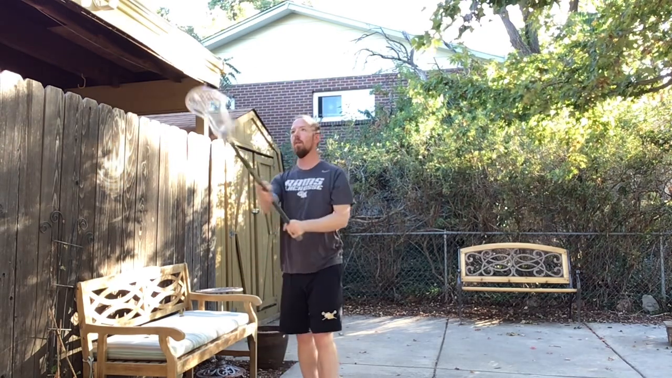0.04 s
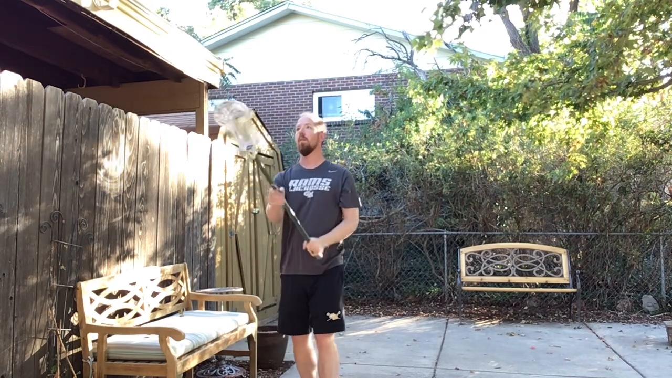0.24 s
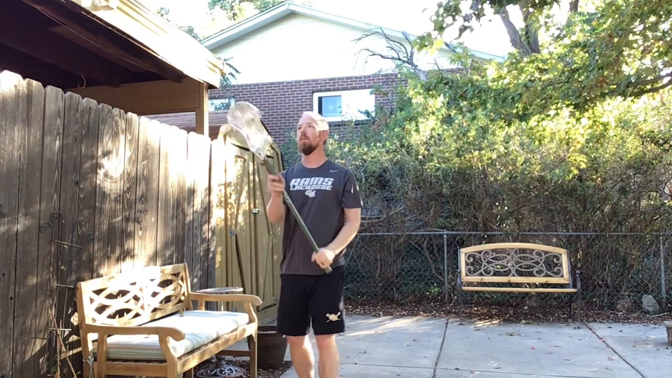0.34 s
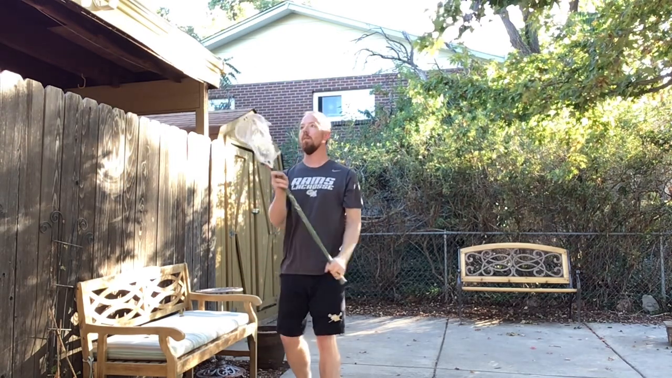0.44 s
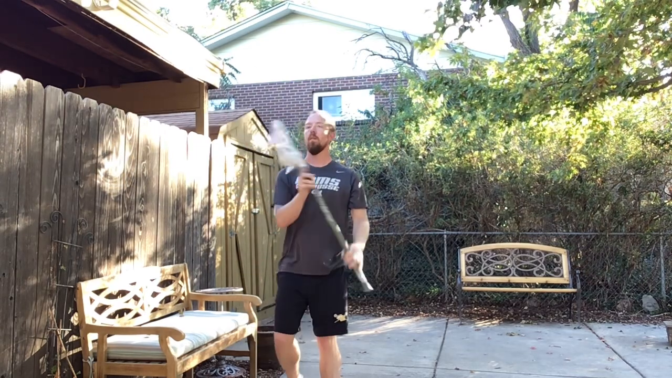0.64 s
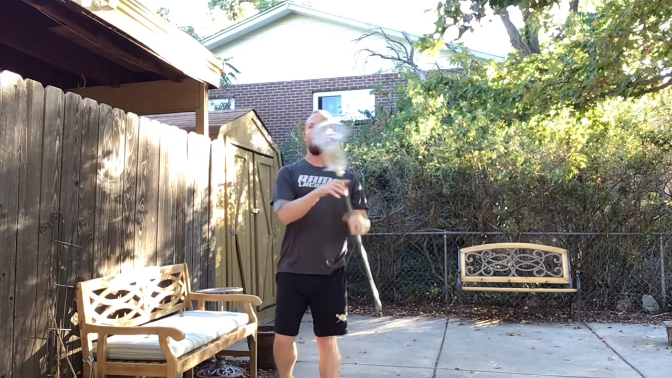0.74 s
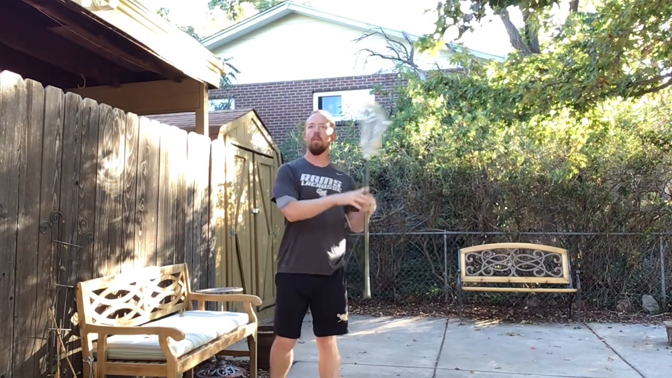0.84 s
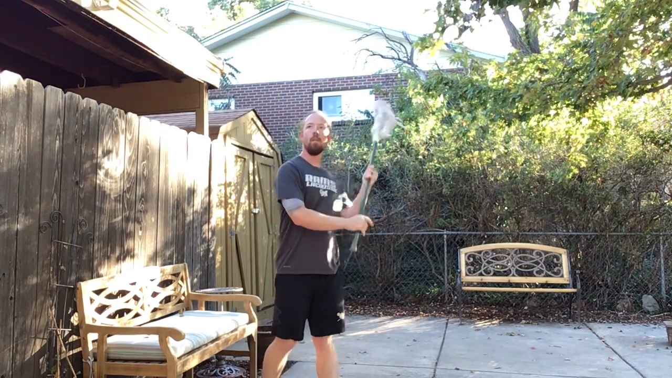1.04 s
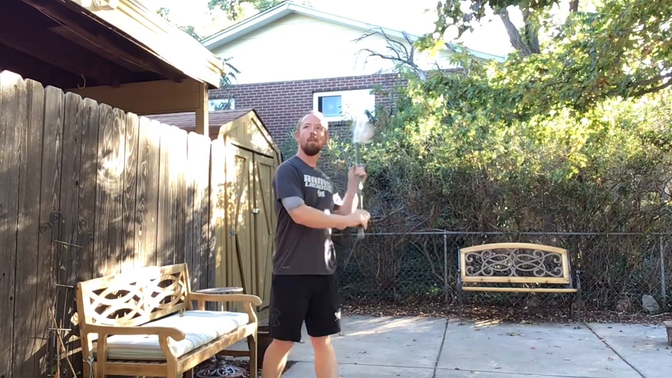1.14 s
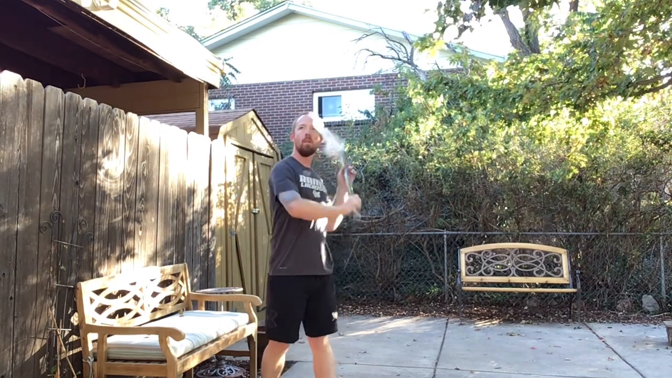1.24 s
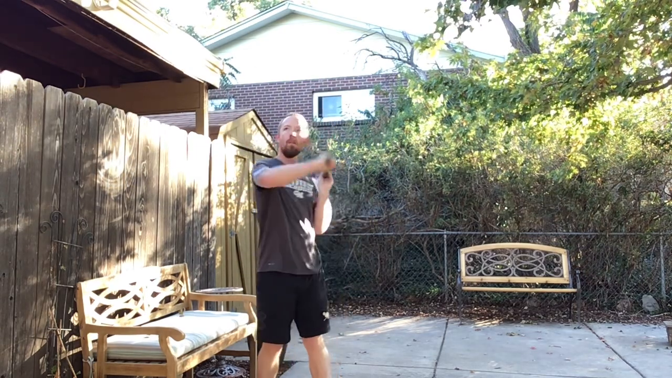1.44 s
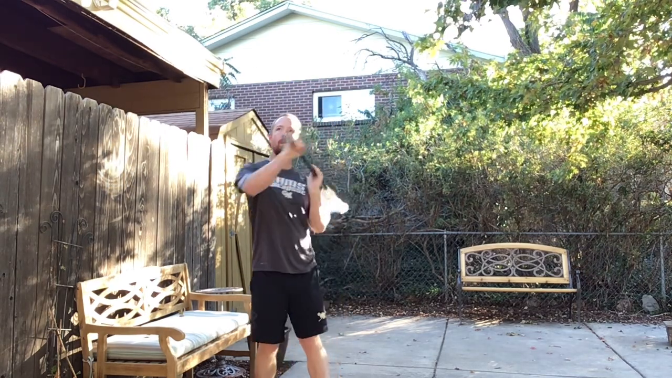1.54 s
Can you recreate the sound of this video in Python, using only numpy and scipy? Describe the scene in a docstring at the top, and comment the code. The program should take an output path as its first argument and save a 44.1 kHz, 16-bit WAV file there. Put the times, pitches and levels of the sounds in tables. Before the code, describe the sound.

Sharp plastic tick and low hollow thump as a ball is caught in a netted stick outdoors

```python
"""Over a wavering machine hum, a rumble and outdoor air (tones and filtered noise), strings hiss in noise swells.
A ball drops into a stick's mesh pocket on a fenced patio: filtered impulses tick on the plastic head, which
rings in damped modes, then the mesh snaps taut in a damped low swing that returns off ground, fence and walls.
As the stick is swung on, more swells hiss before, between and after two faint rattles of grainy noise;
soft low bumps, damped swings too, fall with the first rattle and towards the end."""
import sys
import numpy as np
from scipy import signal
from scipy.fft import rfft, irfft
from scipy.io import wavfile

SR = 44100
rng = np.random.default_rng(int(sys.argv[2]) if len(sys.argv) > 2 else 0)


def put_to_file(sound):
    """Save the sound as 16-bit audio at rate SR, in the file named by the first command-line argument."""
    columns = np.atleast_2d(sound).T  # one column per channel
    safe = np.clip(columns, -1, 1)
    whole_steps = np.round(safe * 32767)
    wavfile.write(sys.argv[1], SR, whole_steps.astype(np.int16))


N = 70560
T = np.arange(N) / SR  # time in seconds

# All levels are those ahead of the microphone response.
# Contacts of ball and plastic head. Each row: start in seconds, level in dB relative to the first touch.
HEAD_CONTACTS = [(0.2246, 0), (0.2263, -6), (0.2279, -8), (0.2300, -15), (0.2328, -15)]
# Spectrum of one contact. Each row: frequency in Hz, gain in dB.
CONTACT_SPECTRUM = [(400, -8), (900, -4), (1600, -4), (3000, -7.5), (4500, -5.5), (6500, -3), (8000, -5),
                    (10500, 0), (13000, -6.5), (16000, -8.5)]
# Resonances of head and shaft. Each row: frequency in Hz, level in dB before STICK_DB is added,
# time to decay by 60 dB in seconds.
STICK_RESONANCES = [(500, -43, .06), (549, -54, .25), (785, -58, .15), (1520, -60, .08), (6570, -61, .1),
                    (7677, -64, .18), (8582, -59, .15), (10471, -57, .15), (11090, -62, .12)]
# Returns of the thump from ground, fence and walls. Each row: delay in seconds,
# level in dB relative to the thump, centre frequency in Hz.
THUMP_ECHOES = [(.0066, -16, 140), (.0122, -8.5, 195), (.0222, -15, 275), (.0268, -8.5, 225),
                (.0440, -17, 280), (.0598, -10.5, 255), (.0680, -15, 245), (.0850, -21, 190)]
# Spectrum of the diffuse end of the thump. Each row: frequency in Hz, gain in dB.
THUMP_TAIL_SPECTRUM = [(40, -11), (65, -7.5), (110, -10), (170, -2.5), (270, 1.5), (330, -4.5),
                       (400, -21.5), (650, -22.5), (1200, -34), (3000, -69.5)]
# Shifts of the ball in the head. Each row: start in seconds, level in dB, rise in seconds,
# time to decay by 60 dB in seconds, tilt in dB per octave, low edge in Hz.
BALL_SHIFTS = [(0.5738, -59, .003, 0.061, -2, 400), (.579, -52, 0.0016, 0.049, -3, 250),
               (0.901, -59.5, 0.00075, 0.032, -0.5, 2400), (0.9096, -56, 0.0011, 0.045, 2, 2400)]
# Spectrum of a rattle before tilt and low edge. Each row: frequency in Hz, gain in dB.
RATTLE_SPECTRUM = [(300, -4), (1000, 0), (2200, 0), (3200, 3), (4000, -4), (5200, -3.5), (8000, -6),
                   (11000, -6), (13000, -12), (16000, -13)]
# Strings brushing as the stick swings. Each row: centre in seconds, level in dB,
# standard deviation of the swell in seconds.
STRING_SWELLS = [(0.174, -80.5, 0.021), (.425, -76, 0.024), (0.748, -76.5, 0.059), (0.99, -81.5, 0.054)]
# Spectrum of the string friction. Each row: frequency in Hz, gain in dB.
STRING_SPECTRUM = [(2000, -11), (5000, -8), (10000, 0.5), (12500, 0), (13700, 4), (16000, -5)]
# Soft low bumps. Each row: start in seconds, level in dB, frequency in Hz.
SOFT_BUMPS = [(.574, -49, 120), (1.125, -55, 205), (1.190, -48, 100), (1.2115, -45, 112),
              (1.5405, -45, 112)]
# Course of the two strong hum lines. Each row: time in seconds, drone level in dB, octave level in dB.
STRONG_HUM_LEVELS = [(0, -55.5, -51), (0.148, -59, -55), (.42, -54, -55), (.55, -59, -59),
                     (.65, -63, -56.5), (.73, -51.5, -64.5), (.86, -56, -62), (1.02, -57.5, -71.5),
                     (1.16, -60, -67.5), (1.36, -63.5, -58), (1.6, -58, -65)]
# Weak hum lines. Each row: frequency in Hz, level in dB, scale of the level waver in dB.
WEAK_HUM_LINES = [(57, -68.5, 0.5), (172.8, -72, -0.5), (335, -79.5, -1.5)]
# Spectrum of the outdoor air before its edges are cut. Each row: frequency in Hz, gain in dB.
AIR_SPECTRUM = [(180, -29), (300, -2.5), (461, -3), (685, -7), (781, -5), (2280, -20), (2830, -17.5),
                (3340, -20), (6790, -25.5), (12100, -31.5), (15500, -57)]
# Spectrum of the rumble. Each row: frequency in Hz, gain in dB.
RUMBLE_SPECTRUM = [(25, -24.5), (38, -8.5), (55, 0.5), (80, 4.5), (115, 1), (150, 1), (220, -6), (300, -13),
                   (500, -44.5)]
# Course of the rumble. Each row: time in seconds, level in dB.
RUMBLE_COURSE = [(0, -61.5), (.3, -54), (.6, -57.5), (.82, -57), (1.0, -61), (1.6, -59.5)]

FIRST_TOUCH_S = HEAD_CONTACTS[0][0]
TICK_DB, STICK_DB = -12.5, 4
NEAR_SCATTER_DB, NEAR_SCATTER_T60_S = -4, 0.023
FAR_SCATTER_DB, FAR_SCATTER_T60_S = -4.5, 0.18
GIVE_HZ, GIVE_RISE_S, GIVE_DB = 153.6, 0.0091, -27
CATCH_S, POCKET_HZ, POCKET_RISE_S, POCKET_DB = 0.2323, 261, 0.0031, -16.5
RECOIL_S, RECOIL_HZ, RECOIL_RISE_S, RECOIL_DB = 0.236, 61.7, 0.017, -50
ECHO_RISE_S = 0.0039
THUMP_TAIL_DB, THUMP_TAIL_RISE_S, THUMP_TAIL_T60_S = -34.5, 0.007, 0.33
RATTLE_GRAINS_PER_S = 9000  # mean rate
RATTLE_TAIL_DB, RATTLE_TAIL_T60_S = -13, 0.21  # level relative to the scuff
BUMP_RISE_S = 0.0062
DRONE_HZ, DRONE_WAVER_DB, OCTAVE_HZ, OCTAVE_WAVER_DB = 112.9, 3, 224.5, 2
HUM_WANDER_HZ = 2.07  # scale of the pitch wander
AIR_DB, AIR_LOW_HZ, AIR_TOP_HZ = -65.5, 267, 14100
BASS_EDGE_HZ, CUTOFF_HZ = 54, 15900


def from_db(db):
    """A level in decibels is twenty times the logarithm of the amplitude ratio."""
    return 10 ** (np.asarray(db) / 20)


def rms_one(x):
    """Division by the root mean square gives a signal unit effective amplitude."""
    return x / np.sqrt(np.mean(x ** 2) + 1e-20)


def coloured(x, colour, tilt_db=0):
    """A folded cepstrum turns a magnitude curve, tilted per octave, into a causal minimum-phase filter."""
    size = 2 * N
    octave = np.log2(np.maximum(np.arange(N + 1) * SR / size, 1))
    hz, db = np.transpose(colour)
    shape_db = np.interp(octave, np.log2(hz), db + tilt_db * np.log2(hz / hz[0]))
    cepstrum = irfft(np.log(from_db(shape_db)))
    cepstrum[1:N] *= 2
    cepstrum[N + 1:] = 0
    response = np.exp(rfft(cepstrum))
    return irfft(rfft(x, size) * response)[:N]


def noise(colour):
    """White noise takes the spectrum of its filter; the result has unit rms."""
    return rms_one(coloured(rng.standard_normal(N), colour))


def drift(rate):
    """Straight lines between random knots, 'rate' per second, give slow bounded motion."""
    knots = rng.uniform(-np.sqrt(3), np.sqrt(3), 64)
    return np.interp(T * rate, np.arange(len(knots)), knots)


def burst(start, rise, t60):
    """Linear damping makes an envelope decay exponentially, here after a straight rise."""
    age = T - start
    decay_db = -60 * np.maximum(age - rise, 0) / t60
    return np.clip(age / rise, 0, 1) * from_db(decay_db)


def thud(start, hz, rise):
    """A softly driven, heavily damped oscillator swings for only a few cycles."""
    age = np.maximum(T - start, 0)
    envelope = (age / rise * np.exp(1 - age / rise)) ** 2  # peaks at 1 when age equals rise
    return envelope * np.sin(2 * np.pi * hz * age)


def scatter(x, t60):
    """Dense reflections act as convolution with decaying noise, here of unit energy."""
    response = rng.standard_normal(N) * burst(0, 1e-3, t60)
    return signal.fftconvolve(x, response / np.linalg.norm(response))[:N]


def tone(hz, db, waver_db):
    """Phase is the integral of frequency, so a drifting frequency wavers in pitch; the level drifts too."""
    phase = 2 * np.pi * np.cumsum(hz + HUM_WANDER_HZ * drift(7.87)) / SR
    level = from_db(db + waver_db * drift(11.93))
    return np.sqrt(2) * level * np.sin(phase)  # the root of two makes db an rms level


def head_ticks():
    """Hard contacts are brief impulses that scatter round the patio and excite the stick's damped modes."""
    clicks = np.zeros(N)
    for start, db in HEAD_CONTACTS:
        clicks[int(start * SR)] += from_db(TICK_DB + db)
    tick = coloured(clicks, CONTACT_SPECTRUM)
    near = from_db(NEAR_SCATTER_DB) * scatter(tick, NEAR_SCATTER_T60_S)
    far = from_db(FAR_SCATTER_DB) * scatter(tick, FAR_SCATTER_T60_S)
    ring = np.zeros(N)
    for hz, db, t60 in STICK_RESONANCES:
        swing = np.sin(2 * np.pi * hz * (T - FIRST_TOUCH_S))
        ring += from_db(STICK_DB + db) * burst(FIRST_TOUCH_S, 1 / hz, t60) * swing
    return tick + near + far + ring


def pocket_thump():
    """A membrane drawn taut swings as a damped oscillator; reflections return it later and softer."""
    # the slack mesh gives from the first touch on, then snaps taut
    give = from_db(GIVE_DB) * thud(FIRST_TOUCH_S, GIVE_HZ, GIVE_RISE_S)
    thump = from_db(POCKET_DB) * thud(CATCH_S, POCKET_HZ, POCKET_RISE_S)
    # the stick dips under the ball
    recoil = from_db(RECOIL_DB) * thud(RECOIL_S, RECOIL_HZ, RECOIL_RISE_S)
    echoes = np.zeros(N)
    for delay, db, hz in THUMP_ECHOES:
        echoes += from_db(POCKET_DB + db) * thud(CATCH_S + delay, hz, ECHO_RISE_S)
    tail_envelope = burst(CATCH_S, THUMP_TAIL_RISE_S, THUMP_TAIL_T60_S)
    tail = from_db(THUMP_TAIL_DB) * tail_envelope * noise(THUMP_TAIL_SPECTRUM)
    return give + thump + recoil + echoes + tail


def rattles():
    """Sliding on mesh and head is a train of random micro-impacts, followed by a faint diffuse tail."""
    out = np.zeros(N)
    for start, db, rise, t60, tilt_db, low_hz in BALL_SHIFTS:
        low_cut = signal.butter(2, low_hz, "high", fs=SR, output="sos")
        grains = rng.standard_normal(N) * (rng.random(N) < RATTLE_GRAINS_PER_S / SR)
        scuff = rms_one(signal.sosfilt(low_cut, coloured(grains, RATTLE_SPECTRUM, tilt_db)))
        hiss = rng.standard_normal(N)
        tail = rms_one(signal.sosfilt(low_cut, coloured(hiss, RATTLE_SPECTRUM, tilt_db)))
        body = scuff * burst(start, rise, t60)
        after = from_db(RATTLE_TAIL_DB) * tail * burst(start, rise, RATTLE_TAIL_T60_S)
        out += from_db(db) * (body + after)
    return out


def swishes():
    """Friction is broadband noise; its amplitude swells and fades as a Gaussian with each swing."""
    swell = np.zeros(N)
    for centre, db, spread in STRING_SWELLS:
        swell += from_db(db) * np.exp(-0.5 * ((T - centre) / spread) ** 2)
    return noise(STRING_SPECTRUM) * swell


def bumps():
    """Soft blows excite low damped swings as the stick is swung and the player turns."""
    return sum(from_db(db) * thud(start, hz, BUMP_RISE_S) for start, db, hz in SOFT_BUMPS)


def machine_hum():
    """A machine's hum is a sum of narrow lines, each wavering in pitch and level."""
    times, drone_db, octave_db = np.transpose(STRONG_HUM_LEVELS)
    drone = tone(DRONE_HZ, np.interp(T, times, drone_db), DRONE_WAVER_DB)
    octave = tone(OCTAVE_HZ, np.interp(T, times, octave_db), OCTAVE_WAVER_DB)
    return drone + octave + sum(tone(*line) for line in WEAK_HUM_LINES)


def outdoor_air():
    """Steady outdoor air is broadband noise, band-limited by a high-pass and a steep low-pass filter."""
    low_cut = signal.butter(2, AIR_LOW_HZ, "high", fs=SR, output="sos")
    top_cut = signal.butter(12, AIR_TOP_HZ, fs=SR, output="sos")
    air = signal.sosfilt(top_cut, signal.sosfilt(low_cut, noise(AIR_SPECTRUM)))
    return from_db(AIR_DB) * rms_one(air)


def low_rumble():
    """Rumble is low-frequency noise whose amplitude varies slowly."""
    level_db = np.interp(T, *np.transpose(RUMBLE_COURSE))
    return from_db(level_db) * noise(RUMBLE_SPECTRUM)


def scene():
    """Pressures superpose: all sources add at one microphone."""
    foreground = head_ticks() + pocket_thump() + rattles() + swishes() + bumps()
    background = machine_hum() + outdoor_air() + low_rumble()
    return (foreground + background)[None]


def record(dry):
    """A microphone is a band-pass system: the deepest bass falls away and the top is cut steeply."""
    hz = np.maximum(np.arange(N + 1) * SR / (2 * N), 1)
    bass = 1 / np.sqrt(1 + (BASS_EDGE_HZ / hz) ** 8)  # 24 dB per octave, without phase shift
    thinned = irfft(rfft(dry, 2 * N) * bass)[:, :N]
    top_cut = signal.ellip(10, 0.2, 70, CUTOFF_HZ, fs=SR, output="sos")  # ripple and stop depth in dB
    return signal.sosfilt(top_cut, thinned)


dry = scene()
out = record(dry)
put_to_file(out)
```